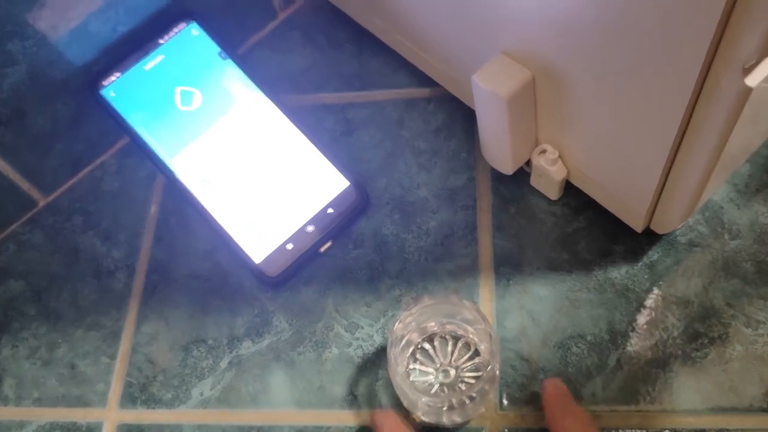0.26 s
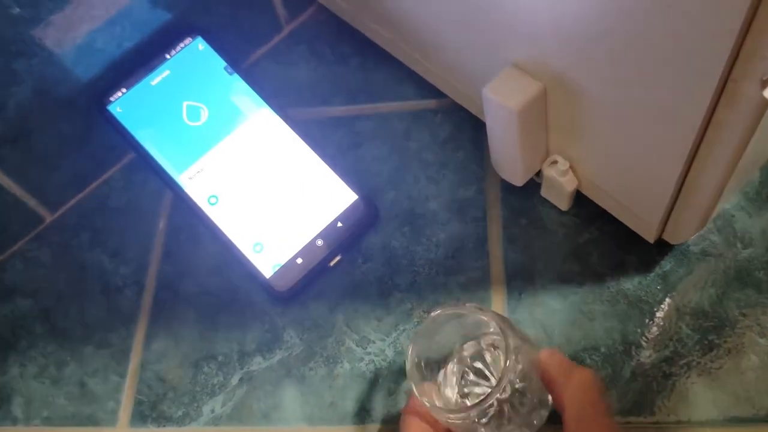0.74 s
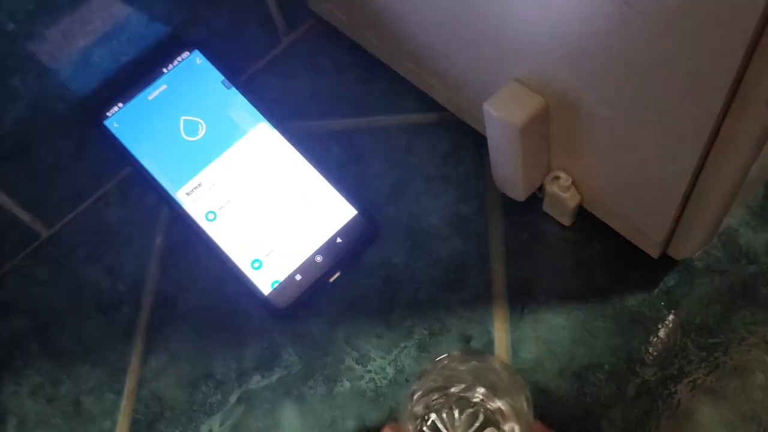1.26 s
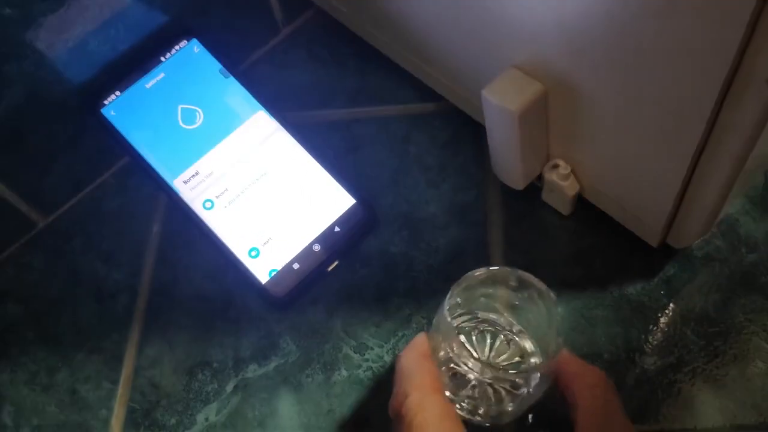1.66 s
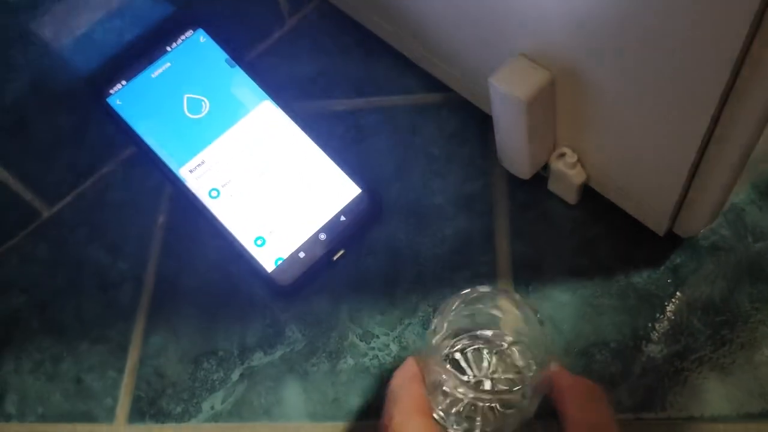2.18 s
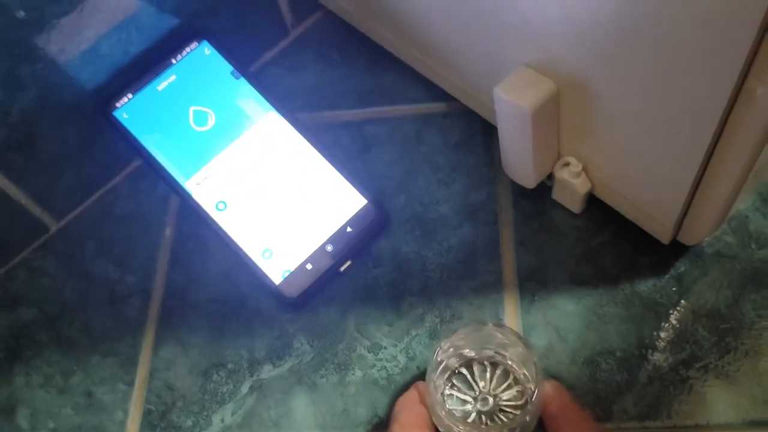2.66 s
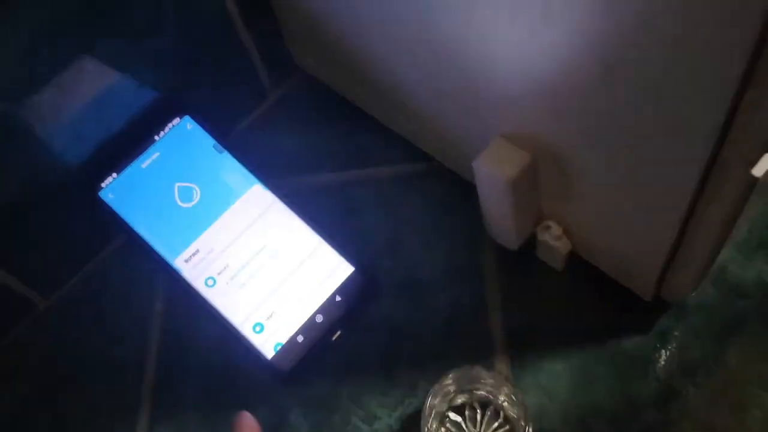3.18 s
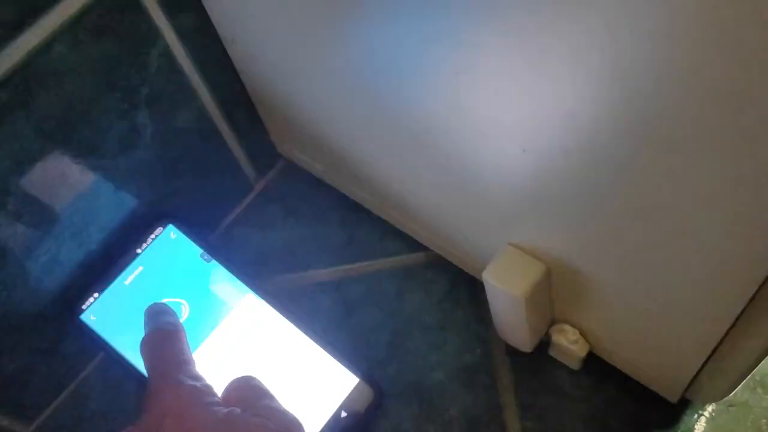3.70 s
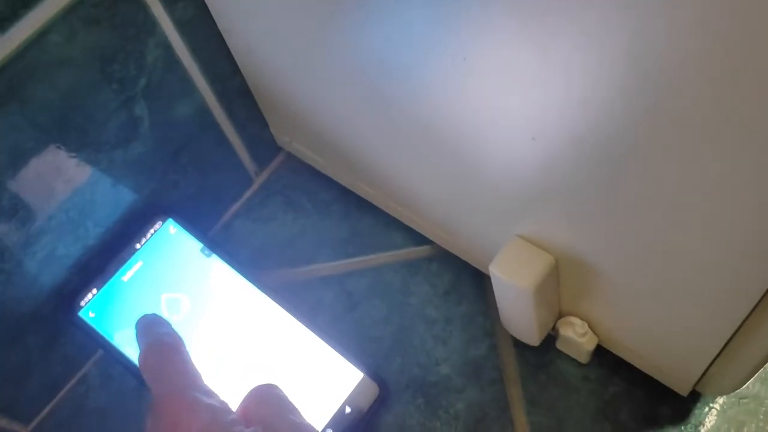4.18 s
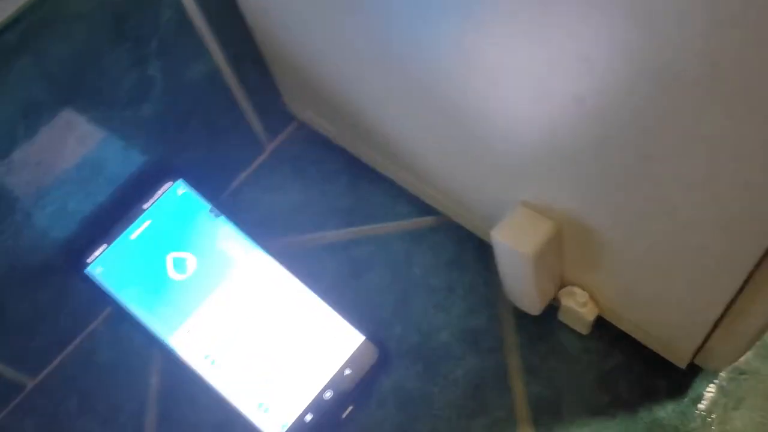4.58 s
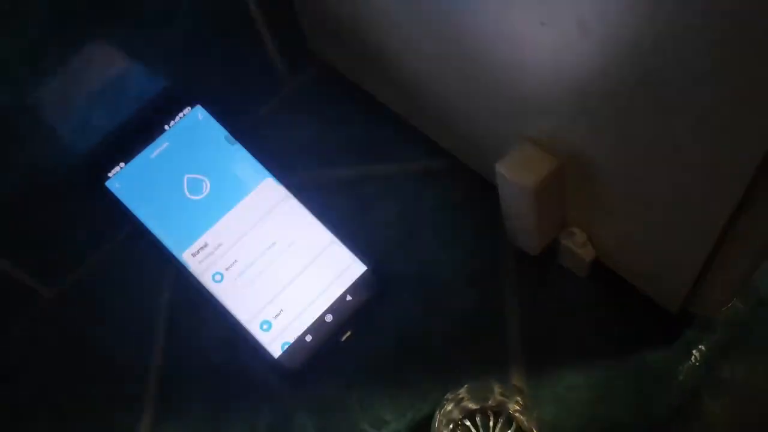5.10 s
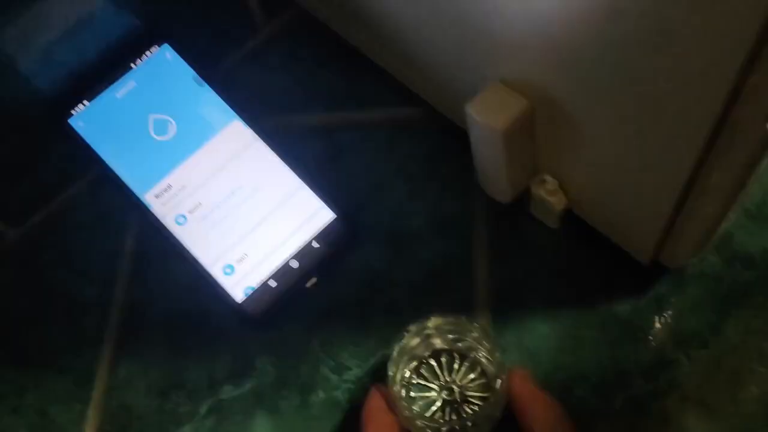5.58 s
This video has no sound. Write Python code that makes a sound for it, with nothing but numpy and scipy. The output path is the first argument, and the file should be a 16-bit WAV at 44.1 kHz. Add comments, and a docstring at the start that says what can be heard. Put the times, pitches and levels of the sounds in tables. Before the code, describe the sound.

Short glass-on-tile clinks come in loose clusters in a small hard room, over faint low rumble and thin wavering hiss.

```python
"""A small drinking glass is tipped, set down and rocked by hand on a bathroom's tile floor.
Its thick foot lands on an edge, then drops flat. Each contact pulses damped modes of glass and tile
and a noise snap; each landing also sounds the rim as two beating sines. Filtered-noise reflections
form the room. Coloured noise makes a low rumble and a thin, wavering hiss.
Soft low bumps and one dry tick come from the microphone's housing."""
import sys
import numpy as np
from scipy import signal
from scipy.fft import rfft, irfft, next_fast_len
from scipy.io import wavfile

SR = 44100
rng = np.random.default_rng(int(sys.argv[2]) if len(sys.argv) > 2 else 0)


def dump_mix(stems):
    """Bounce the given channels to the path in sys.argv[1] as a 16-bit WAV at rate SR."""
    frames = np.atleast_2d(stems).T  # one column per channel
    limited = np.clip(frames, -1, 1)  # hard clip at full scale
    pcm = np.round(limited * 32767).astype(np.int16)
    wavfile.write(sys.argv[1], SR, pcm)


N = 257825
T = np.arange(N) / SR
SIDES = np.array([[1], [-1]])  # left, right

# hand-damped glass body:
# (frequency [Hz], relative level [dB], T60 [s], left-right level [dB], left phase lead [rad])
GLASS_MODES = [(1310, -8, 0.047, 1, 4), (1242.5, -14.5, 0.012, 2, -5.2), (1476.4, 5.5, 0.039, 2.5, 1.24),
               (1586, -5.5, 0.037, 3.5, 1.5), (1732, -4.5, 0.032, -17.5, -0.57),
               (2162, -1, 0.021, -1.5, 0.97), (2315, -2.5, 0.013, -4, 1.06), (2742, -14.5, 0.018, 14, 1.3),
               (2910, -14, 0.0237, -2.5, 2.74), (3200, -15, 0.0086, -2.5, -1),
               (3550, -15.5, 0.01, 0.5, 0.7), (3870, -24.5, 0.034, 4.5, -1.5), (4322, -6.5, .018, 5, 0.56)]
# bedded tile:
# (frequency [Hz], relative level [dB], T60 [s], left-right level [dB], left phase lead [rad])
TILE_MODES = [(350, -33.5, 0.028, -1, -0.59), (527, -21.5, 0.029, 6.5, -0.3),
              (691, -25.5, 0.095, 2.5, -0.3), (775, -15, 0.048, -5.5, -0.6), (1075, -23, 0.023, 3.5, .6)]
# edge landing, then flat drop: (time [s], edge force [dB], contact hardness [Hz], delay to drop [s],
# drop re edge force [dB], tile knock offset [dB], rim note re edge force [dB])
LANDINGS = [ (0.3674, -54, 810, .0115, 10.5, -4.5, -14), (0.4971, -37, 5770, 0.01, -3.5, 0.5, -21),
            (0.546, -60.5, 2450, 0.0045, 3, -10.5, -25), (0.5815, -48.5, 1900, .008, -19, -12.5, -19),
            (0.6185, -37.5, 5200, 0.0032, 6, 2.5, -18), (0.6243, -35.5, 6840, 0.011, -2, 3, -14.5),
            (2.4436, -20, 4970, 0.012, -11.5, -4.5, -16.5), (2.4676, -26.5, 3520, 0.027, -13.5, 7, -27.5),
            (2.5350, -38, 1620, .011, 4, 5.5, -41), (2.5992, -41.5, 2440, 0.0088, -1.5, 0, -31),
            (2.6440, -47.5, 1400, .011, 4, -1.5, -25), (2.7129, -36.5, 1250, 0.014, 3, -0.5, -51),
            (3.0064, -42, 1630, 0.014, 0, -3, -53), (3.041, -47, 1970, 0.016, 5.5, -2.5, -26),
            (3.084, -40, 2150, 0.0087, -0.5, 0.5, -17.5), (3.1164, -36, 1680, 0.025, -17, -3, -43),
            (3.155, -35, 2020, .011, 7.5, -7, -21), (3.1875, -33, 3030, .0043, 5.5, -19, -4.5),
            (3.2020, -37.5, 2000, .010, 3.5, 3, -13), (5.3090, -42, 1570, 0.0045, 9.5, 1, -11),
            (5.6708, -35, 840, 0.00446, 0, 4, -46)]
# soft bumps on the microphone's housing: (time [s], force [dB])
HOUSING_BUMPS = [(0.499, -52), (0.547, -48.5), (0.63, -42.5), (0.662, -49), (0.68, -45.5), (0.862, -55)]
# late room decay: (frequency [Hz], T60 [s])
ROOM_T60 = [(150, 0.458), (500, 0.34), (1000, 0.21), (1600, 0.25), (3000, 0.092), (5000, .18),
            (12000, 0.097)]
# wall reflection strength: (frequency [Hz], relative level [dB])
REFLECTION_COLOUR = [(150, 3.5), (500, 6), (1000, 4), (1600, -3.5), (3000, 0.5), (4400, 4.5), (12000, 25)]
# rumble colour: (frequency [Hz], relative density [dB per Hz])
RUMBLE_SPECTRUM = [(25, -4), (40, -14), (65, -4), (105, 0), (135, -5), (165, -3.5), (240, -14), (420, -14),
                   (700, -17.5), (1500, -23), (3000, -27.5), (6000, -43.5)]
# hiss colour: (frequency [Hz], relative density [dB per Hz])
HISS_SPECTRUM = [(4000, -4.5), (6500, -5.5), (7800, -13), (9200, 0.5), (10500, -3.5), (12000, 1),
                 (14000, -5.5)]
# background likeness: (frequency [Hz], left-right correlation [-])
BACKGROUND_LIKENESS = [(60, 0.89), (130, 0.78), (290, 0.31), (630, 0.12), (1400, 0.014), (3000, 0),
                       (7000, 0.89), (9500, .1), (12000, 0.89), (14000, .8)]
# background balance: (frequency [Hz], left-right level [dB])
BACKGROUND_BALANCE = [(100, 1), (1000, -2), (4500, 0.5), (7000, 1), (9300, -12.5), (12000, -9), (14000, 1)]
# hiss swells: (centre time [s], rise [dB], half-width to 1/e of the dB rise [s])
HISS_SWELLS = [(0.28, 5, 0.32), (3.0, 2.5, 0.54), (3.38, 8.5, 0.13)]

RUMBLE_DB, HISS_DB = -62, -72
# knock and grit re force, at middling force: an edge clacks, a flat foot knocks the tile
MIDDLING_DB, EDGE_KNOCK_DB, FLAT_KNOCK_DB, EDGE_GRIT_DB, FLAT_GRIT_DB = -38, -3, 6, -0.5, -2.5
# fall relative to force on a harder, cleaner touch
KNOCK_FALL_DB_PER_DB, GRIT_FALL_DB_PER_DB = 0.77, 0.57
# T60 is for a rim note at 0 dB re force; grip shortens it by this share of the note's dB cut
RIM_HZ, RIM_T60_S, GRIP_DAMPING_DB_PER_DB, RIM_PAN_DB = 4358, 0.40, 0.22, 3.5
TICK_S, TICK_DB, TICK_PAN_DB = 3.44, -19.5, -4
CUTOFF_HZ = 14400


def from_db(db):
    """Decibels to amplitude gain."""
    return 10 ** (np.asarray(db) / 20)


def rms_one(x):
    """Scale to unit rms."""
    return x / np.sqrt(np.mean(x ** 2))


def at_hz(points, hz):
    """Interpolate a table on a log-frequency axis."""
    freqs_hz, values = np.transpose(points)
    return np.interp(np.log(hz), np.log(freqs_hz), values)


def butter(x, hz, kind, order=2):
    """Causal Butterworth filter."""
    sos = signal.butter(order, hz, kind, fs=SR, output="sos")
    return signal.sosfilt(sos, x)


def through(x, response):
    """Convolve with a stereo impulse response."""
    return signal.fftconvolve(np.atleast_2d(x), response, axes=-1)[:, :N]


def waver(rate_hz):
    """Slow random drift of unit rms."""
    drift = butter(rng.standard_normal(N + SR), rate_hz, "low")
    return rms_one(drift[SR:])  # skip filter onset


def steady_noise(spectrum):
    """Stereo noise with set colour, correlation and balance; overall rms 1."""
    size = next_fast_len(N)
    hz = np.maximum(np.fft.rfftfreq(size, 1 / SR), 1)
    mid, side = rfft(rng.standard_normal((2, size)))
    alike = np.clip(at_hz(BACKGROUND_LIKENESS, hz), -1, 1)
    stereo = np.sqrt(1 + alike) * mid + SIDES * np.sqrt(1 - alike) * side
    gain = from_db(at_hz(spectrum, hz) + SIDES * at_hz(BACKGROUND_BALANCE, hz) / 2)
    return rms_one(irfft(gain * stereo, size)[:, :N])


def background():
    """Low room rumble plus a thin hiss whose level wavers and swells."""
    swell_db = sum(db * np.exp(-((T - s) / width_s) ** 2) for s, db, width_s in HISS_SWELLS)
    hiss_db = HISS_DB + swell_db + 0.91 * waver(rate_hz=12)
    rumble = from_db(RUMBLE_DB) * butter(steady_noise(RUMBLE_SPECTRUM), 19.86, "high")
    hiss = from_db(hiss_db) * steady_noise(HISS_SPECTRUM)
    return rumble + hiss


def touches():
    """Split landings into edge and flat: (time [s], force [dB], hardness [Hz], knock [dB], grit [dB])."""
    rows = []
    for s, edge_db, hard_hz, drop_s, drop_db, tile_db, _ in LANDINGS:
        edge = (s, edge_db, EDGE_KNOCK_DB, EDGE_GRIT_DB)
        flat = (s + drop_s, edge_db + drop_db, FLAT_KNOCK_DB, FLAT_GRIT_DB)
        for at_s, force_db, knock_db, grit_db in (edge, flat):
            excess_db = force_db - MIDDLING_DB
            knock_db = tile_db + knock_db - KNOCK_FALL_DB_PER_DB * excess_db
            grit_db = grit_db - GRIT_FALL_DB_PER_DB * excess_db
            rows.append((at_s, force_db, hard_hz, knock_db, grit_db))
    return np.transpose(rows)


def pushes(times_s, levels_db, hardness_hz, grit_db=None, roll_s=0.01, grit_hz=2350):
    """Unit-area force pulses, longer when soft; a rolling foot adds a dying run of tiny touches."""
    out, t = np.zeros(N), T[:SR // 16]
    for k, (s, db, hz) in enumerate(zip(times_s, levels_db, hardness_hz)):
        pulse = t * np.exp(-2 * np.pi * hz * t)
        pulse = pulse / pulse.sum()
        if grit_db is not None:
            grit = rng.standard_normal(len(t)) * t * np.exp(-2 * (t / roll_s) ** 2)
            grit = butter(grit / np.linalg.norm(grit), max(grit_hz, hz), "low", order=6)
            rolling = signal.fftconvolve(pulse, grit)[:len(t)]
            pulse = pulse + from_db(grit_db[k]) * rolling
        start = round(s * SR)
        out[start:start + len(t)] += from_db(db) * pulse[:N - start]
    return out


def ringing(modes):
    """Stereo response of damped modes; neighbours swing in opposite sense."""
    t, response = T[:SR // 2], 0
    for k, (hz, db, t60_s, pan_db, lead_rad) in enumerate(modes):
        envelope = from_db(db + SIDES * pan_db / 2 - 60 * t / t60_s)
        swing = np.sin(2 * np.pi * hz * t + SIDES * lead_rad / 2)
        response = response + (-1) ** k * envelope * swing
    return response


def crack(t60_s, low_hz, high_hz):
    """Decaying noise burst for unresolved high modes, unit energy a side."""
    t = T[:SR // 10]
    burst = rng.standard_normal((2, len(t))) * from_db(-60 * t / t60_s)
    burst = butter(burst, [low_hz, high_hz], "band")
    return burst / np.linalg.norm(burst, axis=1, keepdims=True)


def glass(body_db, tile_db, crack_db, top_hz):
    """Each contact drives glass body and tile together; returns clack and bright snap."""
    s, force_db, hard_hz, knock_db, grit_db = touches()
    force = pushes(s, force_db, hard_hz, grit_db, roll_s=0.00795)
    tile_force = pushes(s, force_db + knock_db, hard_hz, grit_db, roll_s=0.011)
    body = through(force, from_db(body_db) * ringing(GLASS_MODES))
    tile = through(tile_force, from_db(tile_db) * ringing(TILE_MODES))
    # blunt foot: little energy above the rim note
    clack = butter(body + tile, top_hz, "low", order=12)
    clack = butter(clack, 250, "high")
    snap = from_db(crack_db) * through(force, crack(t60_s=0.01, low_hz=6040, high_hz=13800))
    return clack, snap


def rim(swell_s, split_hz, twin_db):
    """Landings sound the slightly oval rim's two beating modes, louder and longer under a looser grip."""
    out, t = np.zeros((2, N)), T[:SR // 2]
    main = np.sin(2 * np.pi * RIM_HZ * t)
    twin = from_db(twin_db) * np.sin(2 * np.pi * (RIM_HZ + split_hz) * t)
    pair = (main + twin) / (1 + from_db(twin_db)) * (1 - np.exp(-t / swell_s))
    for s, force_db, *_, rim_db in LANDINGS:
        t60_s = RIM_T60_S * from_db(GRIP_DAMPING_DB_PER_DB * rim_db)
        note = pair * from_db(force_db + rim_db + SIDES * RIM_PAN_DB / 2 - 60 * t / t60_s)
        start = round(s * SR)
        out[:, start:start + len(t)] += note[:, :N - start]
    return out


def bathroom(x, wet_db, early_db, early_t60_s, gap_s):
    """Add dense near-tile reflections and a tail with frequency-dependent decay, as banded noise."""
    t, edges_hz = T[:int(0.7 * SR)], np.geomspace(100, 15000, 16)
    response, white = 0, rng.standard_normal((2, 2, len(t)))
    arrival = np.clip(t / gap_s - 1, 0, 1)  # silent for gap_s, full at twice that
    for k, (low_hz, high_hz) in enumerate(zip(edges_hz, edges_hz[1:])):
        hz = np.sqrt(low_hz * high_hz)
        late = from_db(-60 * t / at_hz(ROOM_T60, hz))
        early = from_db(early_db - 60 * t / early_t60_s)
        band = butter(white[k % 2], [low_hz, high_hz], "band") * (late + early) * arrival
        # energy in proportion to bandwidth
        share = np.sqrt(2 * (high_hz - low_hz) / SR) / np.linalg.norm(band, axis=1, keepdims=True)
        response = response + from_db(wet_db + at_hz(REFLECTION_COLOUR, hz)) * share * band
    return x + through(x, response)


def bumps(hz, t60_s, pan_db):
    """Hand-held housing thuds at one low, quickly damped mode, louder on the right."""
    s, force_db = np.transpose(HOUSING_BUMPS)
    force = pushes(s, force_db, np.full(len(s), 200))
    return through(force, ringing([(hz, 4, t60_s, pan_db, 0)]))


def tick():
    """One light, dry tick on the housing: a pulsed noise burst, louder on the right."""
    force = pushes([TICK_S], [TICK_DB], [2500])
    burst = through(force, crack(t60_s=0.053, low_hz=495, high_hz=7100))
    return burst * from_db(SIDES * TICK_PAN_DB / 2)


def scene():
    """Sum glass in the room, housing sounds and background; rim and snap beam at the mic, so drier."""
    clack, snap = glass(body_db=1.5, tile_db=1.0, crack_db=-3.5, top_hz=4556)
    note = rim(swell_s=0.0054, split_hz=2.3, twin_db=-5)
    room_clack = bathroom(clack, wet_db=-2.5, early_db=5.5, early_t60_s=0.042, gap_s=0.0026)
    room_ring = bathroom(note + snap, wet_db=-15, early_db=-5.5, early_t60_s=0.05, gap_s=0.0026)
    housing = bumps(hz=88.3, t60_s=0.058, pan_db=-22) + tick()
    return background() + room_clack + room_ring + housing


def record(dry):
    """Steep elliptic low-pass at the top of the band."""
    sos = signal.ellip(12, 0.1, 80, CUTOFF_HZ, fs=SR, output="sos")
    return signal.sosfilt(sos, dry)


dry = scene()
out = record(dry)
dump_mix(out)
```